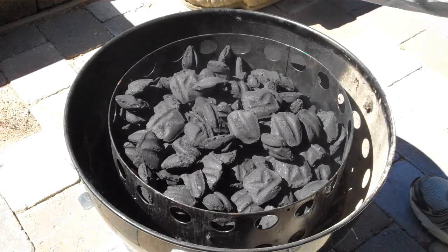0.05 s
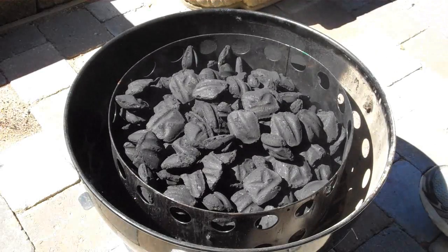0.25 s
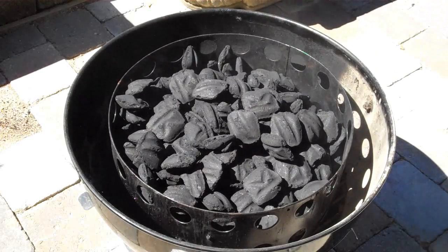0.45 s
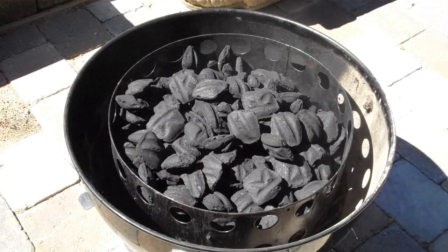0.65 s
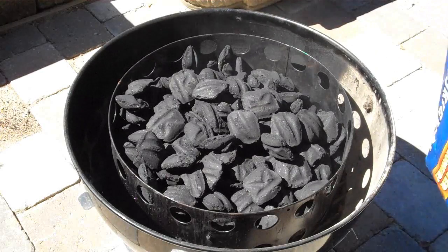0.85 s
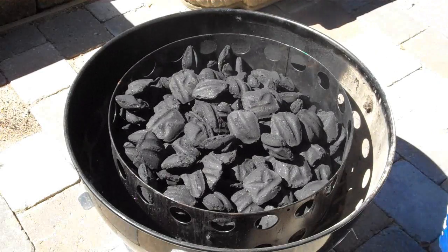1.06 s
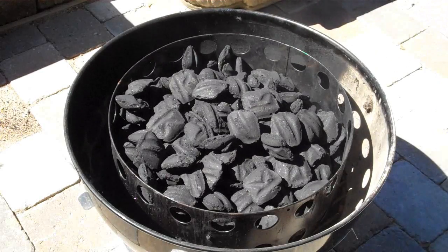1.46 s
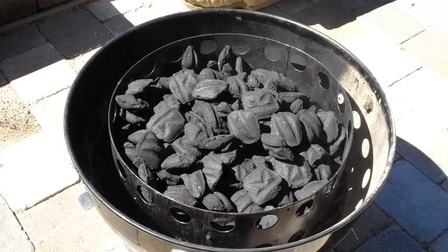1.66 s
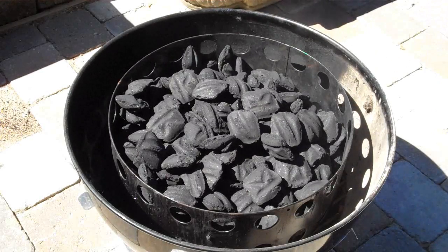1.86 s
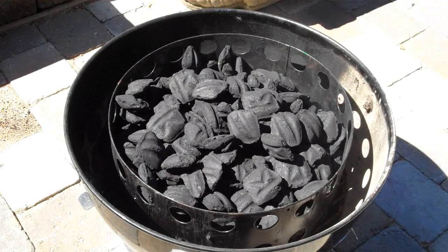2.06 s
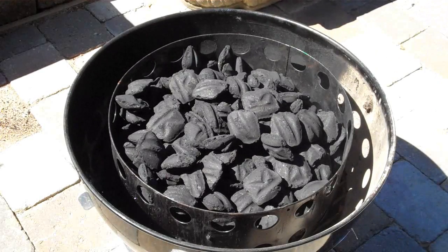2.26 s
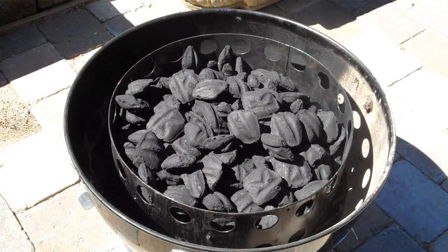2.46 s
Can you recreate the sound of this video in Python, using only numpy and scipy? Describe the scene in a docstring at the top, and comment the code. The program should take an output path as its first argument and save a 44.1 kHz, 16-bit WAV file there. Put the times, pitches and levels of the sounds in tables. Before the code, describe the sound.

Stiff paper crumples as a charcoal bag is handled near the microphone on a patio. A few tiny high chirps come first, then lumps shift with hollow knocks, and the paper snaps and ticks again as it settles.

```python
"""A stiff paper bag of charcoal is lifted, tipped and set down beside a kettle grill on a patio.
The paper crumples in tiny damped rings, its panels snap and its stiff folds tick,
while the briquettes inside tumble and knock dully against it.
A few short high chirps sound early on, over faint outdoor air; nearby walls answer."""
import sys
import numpy as np
from scipy import signal
from scipy.fft import rfft, irfft, next_fast_len
from scipy.io import wavfile
from scipy.ndimage import uniform_filter1d, map_coordinates

SR = 44100
rng = np.random.default_rng(int(sys.argv[2]) if len(sys.argv) > 2 else 0)


def generate_wav(signal):
    """Clip the signal to [-1, 1] and save it as 16-bit WAV at the path in sys.argv[1]."""
    frames = np.transpose(np.atleast_2d(signal))
    scaled = np.clip(frames, -1, 1) * 32767
    pcm = np.round(scaled).astype(np.int16)
    wavfile.write(sys.argv[1], SR, pcm)


N = 110250


def amp(db):
    """Decibels to gain."""
    return 10 ** (np.asarray(db) / 20)


def unit(x):
    """Scale to rms 1."""
    return x / np.sqrt(np.mean(x ** 2) + 1e-20)


def along(points, hz):
    """Interpolate (Hz, value) points on a log frequency axis."""
    point_hz, values = np.transpose(points)
    return np.interp(np.log(hz + 1), np.log(point_hz + 1), values)


def curves(rows):
    """One value per sample for each column after the time."""
    times_s, *columns = np.transpose(rows)
    return [np.interp(np.arange(N) / SR, times_s, column) for column in columns]


def coloured(x, spectrum):
    """Minimum-phase filter through (Hz, dB) points."""
    size = 2 * next_fast_len(N // 2 + 8192)
    gain = amp(along(spectrum, np.fft.rfftfreq(size, 1 / SR)))
    cepstrum = irfft(np.log(gain), size)
    cepstrum[1:size // 2] *= 2
    cepstrum[size // 2 + 1:] = 0
    return irfft(rfft(x, size) * np.exp(rfft(cepstrum)), size)[..., :N]


def add(track, start_s, sound):
    """Mix a sound in at a time."""
    part = track[max(round(start_s * SR), 0):][:len(sound)]
    part += sound[:len(part)]


def burst(t, t60_s, lo_hz, hi_hz, spiky):
    """A dying spray of micro-cracks in a band, starting at about rms 1."""
    fade = amp(-60 * t / t60_s)
    cracks = rng.standard_normal(len(t)) * np.exp(spiky * rng.standard_normal(len(t)))
    bandpass = signal.butter(2, [lo_hz, hi_hz], "band", fs=SR, output="sos")
    return unit(signal.sosfilt(bandpass, cracks * fade)) * np.sqrt(np.mean(fade ** 2))


def grains(per_s, lo_hz, hi_hz, decay_cycles, spread_db, samples):
    """Random tiny damped rings, with an even spectrum between two pitches."""
    when, pitch, strength, polarity = rng.random((int(per_s * N / SR), 4)).T
    hz = lo_hz * (hi_hz / lo_hz) ** pitch[:, None]
    age = np.arange(samples)
    cycles = hz * age / SR
    gain = amp(-spread_db * np.log(1 - .97 * strength)) * np.sign(polarity - .5)
    rings = gain[:, None] * hz * np.sin(2 * np.pi * cycles) * np.exp(-cycles / decay_cycles)
    positions = (when * N).astype(int)[:, None] + age
    return np.bincount(positions.ravel(), rings.ravel(), N)[:N]


def stick_slip(per_s, t60_s, depth):
    """A gain that jumps at random slips and settles back."""
    chance, size = rng.random((2, N))
    slips = (chance < per_s / SR) * size
    jolts = signal.lfilter([1], [1, -amp(-60 / (t60_s * SR))], slips)
    return unit(1 + depth * jolts)


# Each row: time in seconds, relative levels in dB of tumbling lumps, crumpling paper, fine crackle.
RUSTLE_LEVELS = [(0,-32,-36,-39),(.1,-43.5,-44,-53.5),(.235,-31,-36.5,-40.5),(.285,-42,-40.5,-47),(.41,-37.5,-32,-40.5),(.485,-23.5,-30,-33),(.53,-30,-29,-36),(.59,-27.5,-24.5,-29.5),(.655,-23.5,-18.5,-22),(.725,-22.5,-18.5,-26),(.765,-24,-25,-34),(.86,-20.5,-22,-29.5),(.97,-24,-23.5,-34),(1.03,-30.5,-30.5,-37),(1.12,-33.5,-36.5,-44.5),(1.29,-34,-34,-45),(1.43,-40,-41.5,-48.5),(1.6,-44.5,-41.5,-52),(1.67,-39,-40.5,-43),(1.85,-40,-39,-53),(1.9,-32.5,-28.5,-43.5),(2.06,-30.5,-25,-32),(2.155,-39.5,-35,-45),(2.28,-34.5,-30,-36),(2.32,-43,-44.5,-61),(2.41,-46.5,-46,-55),(2.46,-34,-26,-36.5),(2.5,-52,-47,-62)]
# Spectra of the three layers. Each row: frequency in Hz, gain in dB.
LUMP_SPECTRUM = [(30,-28.5),(90,-7.5),(150,-12.5),(230,-2.5),(335,0.5),(680,-1.5),(1600,-28.5),(4000,-58)]
PAPER_SPECTRUM = [(200,-22.5),(500,-8),(850,-0.5),(1300,-0.5),(1800,-0.5),(2600,-2.5),(3400,-5.5),(5000,-11),(15000,-70)]
CRACKLE_SPECTRUM = [(1500,-37),(3200,-0.5),(4500,1),(8500,-6.5),(10500,-10),(12000,-16),(14000,-31)]


def rustle():
    """Lumps tumble, paper crumples and fine creases crackle as the bag moves."""
    lumps_db, paper_db, crackle_db = curves(RUSTLE_LEVELS)
    lumps = grains(per_s=900, lo_hz=60.2, hi_hz=1410, decay_cycles=2.57, spread_db=2.5, samples=1500)
    paper = grains(per_s=5000, lo_hz=525, hi_hz=6240, decay_cycles=0.63, spread_db=4.5, samples=250)
    crackle = grains(per_s=2800, lo_hz=2920, hi_hz=13400, decay_cycles=0.31, spread_db=4.5, samples=60)
    layers = amp(lumps_db) * unit(coloured(lumps, LUMP_SPECTRUM))
    layers += amp(paper_db + 1) * unit(coloured(paper, PAPER_SPECTRUM))
    layers += amp(crackle_db + 1) * unit(coloured(crackle, CRACKLE_SPECTRUM))
    return layers * stick_slip(per_s=42, t60_s=0.013, depth=0.67)


# Spectrum of the air. Each row: frequency in Hz, gain in dB.
AIR_SPECTRUM = [(25, -7), (60, -1.5), (1000, -5), (3000, -8.5), (8000, -22), (11500, -41), (14000, -57)]


def outdoor_air():
    """Steady faint noise, wider in the treble and a little louder on the left."""
    mid, side = rng.standard_normal((2, N))
    side = coloured(side, [(200, -19.5), (1000, -10.5), (4000, -2.5)])
    air = unit(coloured(np.array([mid + side, mid - side]), AIR_SPECTRUM))
    return amp(-43) * air * amp([[1.1], [-1.1]])


# Snapping panels. Each row: start in seconds, relative level in dB, panel pitch in Hz,
# relative bass and treble levels in dB, crinkle t60 in seconds.
PANEL_SNAPS = [(.033,-27.5,740,-28.5,-43,0.14),(.096,-29.5,1740,-29.5,-36.5,0.077),(.183,-30.5,1030,-52,-42,0.068),(0.2107,-20.5,1190,-22,-32,0.067),(.262,-25.5,710,-38,-35.5,0.018),(.318,-22,2110,-33,-37.5,0.02),(0.3471,-23.5,2670,-37,-34,0.035),(0.4489,-18.5,686,-34,-30,0.099),(0.485,-21.5,1530,-26,-26,0.12),(.733,-15,2080,-36,-23.5,0.036),(.919,-21,960,-39,-31,0.029),(0.9647,-23,1480,-21,-30,0.071),(1.141,-19,880,-29,-27.5,0.087),(1.196,-19,895,-32,-32.5,0.044),(1.2342,-18.5,760,-42,-32.5,.049),(1.287,-22.5,2130,-47,-41,0.037),(1.351,-28.5,1310,-32,-34.5,0.15),(1.7594,-24,720,-26.5,-34.5,0.11),(1.8221,-23,760,-33,-43.5,0.11),(1.874,-14,1380,-28,-25,0.048),(1.9674,-20,910,-25,-32.5,0.079),(2.0399,-15.5,1120,-26,-50,0.07),(2.063,-21,820,-24.5,-26.5,0.049),(2.122,-21.5,980,-28.5,-28.5,.05),(2.182,-28.5,725,-35.5,-32,0.035),(2.223,-30.5,814,-46,-31,0.067),(2.353,-33,1000,-38,-43,0.099)]
# Filter on all snaps. Each row: frequency in Hz, gain in dB.
SNAP_EQ = [(50,-1),(150,-2.5),(1500,0.5),(6000,-1),(8500,-9),(10500,-10),(12000,-19.5),(14500,-49)]


def panel_snaps():
    """A paper panel flips with a pop and a crack, flexes near its pitch, shakes the bag and crinkles."""
    t60_cycles, bass_t60_s = 6.4, 0.064
    out, t = np.zeros(N), np.arange(SR // 6) / SR
    for start_s, db, hz, bass_db, treble_db, crinkle_t60_s in PANEL_SNAPS:
        pop = amp(10) * np.sin(2 * np.pi * hz * t) * amp(-60 * t * hz / t60_cycles)
        flex = amp(-3.5) * burst(t, 1.29 * crinkle_t60_s, lo_hz=0.85 * hz, hi_hz=1.16 * hz, spiky=0.77)
        crinkle = amp(7) * burst(t, crinkle_t60_s, lo_hz=1060, hi_hz=3590, spiky=0.54)
        shake = burst(t, bass_t60_s, lo_hz=219, hi_hz=580, spiky=0.05)
        push = amp(-12) * burst(t, bass_t60_s, lo_hz=71, hi_hz=178, spiky=0.23)
        fizz = burst(t, t60_s=0.042, lo_hz=3650, hi_hz=11300, spiky=1.53)
        crack = amp(12.5) * burst(t, t60_s=0.0018, lo_hz=2510, hi_hz=13400, spiky=0.19)
        middle = amp(db) * (pop + flex) + amp((db + treble_db) / 2) * crinkle
        bass = amp(bass_db + 3) * (shake + push)
        treble = amp(treble_db + 6) * (fizz + crack)
        add(out, start_s, middle + bass + treble)
    return coloured(out, SNAP_EQ)


# Briquettes hitting the bag. Each row: start in seconds, relative level in dB, pitch in Hz.
BRIQUETTE_KNOCKS = [(.162,-23,690),(.734,-6.5,360),(0.78,-6.5,328),(0.864,-11,349),(.885,-7.5,410),(.919,-6,514),(1.3075,-10.5,810),(1.5301,-22,864),(1.581,-26,1100),(1.717,-12.5,890),(2.424,-24.5,880)]


def briquette_knocks():
    """A falling briquette gives a hollow ring, a gritty scuff and a soft push."""
    t60_cycles = 18
    out, t = np.zeros(N), np.arange(SR // 5) / SR
    for start_s, db, hz in BRIQUETTE_KNOCKS:
        ring = np.sin(2 * np.pi * hz * t) * amp(-60 * t * hz / t60_cycles)
        scuff = amp(-6) * burst(t, t60_s=0.076, lo_hz=0.73 * hz, hi_hz=2.1 * hz, spiky=0.62)
        push = amp(-31) * burst(t, t60_s=0.26, lo_hz=55, hi_hz=159, spiky=0.11)
        add(out, start_s, amp(db - 6) * (ring + scuff + push))
    return out


# High chirps. Each row: centre in seconds, level in dB.
CHIRP_SWELLS = [(0.2154, -12), (0.225, -19), (0.289, -22), (0.2962, -18), (0.475, -14)]


def chirps():
    """Brief Gaussian swells of one slightly wavering high tone."""
    pitch_hz, waver_rms_hz, sigma_s = 3770, 232, 0.0017
    t = np.arange(N) / SR
    hz = pitch_hz + waver_rms_hz * unit(uniform_filter1d(rng.standard_normal(N), size=50))
    swells = sum(amp(db) * np.exp(-.5 * ((t - centre_s) / sigma_s) ** 2) for centre_s, db in CHIRP_SWELLS)
    return swells * np.sin(2 * np.pi * np.cumsum(hz) / SR)


# Folds giving way. Each row: start in seconds, relative level in dB, ring pitch in Hz.
FOLD_TICKS = [(0.3468,-21,3240),(0.4832,-18,3800),(.6025,-20,4360),(0.7263,-13,5830),(0.883,-12.5,4950),(.9185,-13,3200),(.9645,-9.5,6500),(0.976,-9,7040),(1.401,-17,1400),(1.4561,-22,6600),(1.6983,-21.5,7800),(1.838,-14.5,7700),(1.8747,-7.5,5800),(1.945,-10.5,4460),(1.979,-18,5550),(2.0228,-26,6000),(2.0407,-17,4200),(2.1229,-6.5,5060),(2.1822,-12,8100),(2.2276,-13,3570)]


def fold_ticks():
    """A stiff fold gives: a brief ring with one overtone, and a separate crack in each channel."""
    t60_cycles, overtone_ratio = 14.4, 1.727
    out, t = np.zeros((2, N)), np.arange(SR // 30) / SR
    for start_s, db, hz in FOLD_TICKS:
        phase = 2 * np.pi * hz * t
        ring = (np.sin(phase) + amp(-5) * np.sin(overtone_ratio * phase)) * amp(-60 * t * hz / t60_cycles)
        for channel in out:
            crack = amp(-3) * burst(t, t60_s=0.00087, lo_hz=1500, hi_hz=12700, spiky=0.2)
            add(channel, start_s, amp(db) * (ring + crack))
    return coloured(out, [(10500, -1), (14000, -27)])


# Where the bag is. Each row: time in seconds, lag of left behind right in ms, left over right in dB.
BAG_POSITION = [(.9, 0.035, 2), (1.8, .11, 1.6)]


def panned(x):
    """Sound from the bag reaches left and right with a small lag and level offset."""
    lag_ms, left_db = curves(BAG_POSITION)
    half_lag_samples = lag_ms * SR / 1000 / 2
    left = amp(left_db / 2) * map_coordinates(x, [np.arange(N) - half_lag_samples])
    right = amp(-left_db / 2) * map_coordinates(x, [np.arange(N) + half_lag_samples])
    return np.array([left, right])


# Decay of the late echo. Each row: frequency in Hz, t60 in seconds.
ECHO_T60 = [(100,0.072),(3000,0.09),(12000,0.26)]
# Filter on the echo. Each row: frequency in Hz, gain in dB.
ECHO_EQ = [(100,-10.5),(500,-14),(1500,-9.5),(4000,-1.5),(12000,1.5)]


def patio_echo(x):
    """Paving, grill and walls scatter a short diffuse echo, crossfading from one random tail to the next."""
    step_s, early_t60_s = 0.04, 0.022
    t = np.arange(N) / SR
    echo = np.zeros((2, N))
    for centre_s in np.arange(0, t[-1] + step_s, step_s):
        hz, age_s, noise = signal.stft(rng.standard_normal((2, SR // 5)), SR, nperseg=256)
        early = amp(10) * amp(-60 * age_s / early_t60_s)
        late = amp(-60 * age_s / along(ECHO_T60, hz)[:, None])
        tail = signal.istft(noise * (early + late), SR, nperseg=256)[1]
        part = x * np.sqrt(np.clip(1 - abs(t - centre_s) / step_s, 0, 1))
        echo += signal.oaconvolve(part[None], tail / np.linalg.norm(tail[0]), axes=1)[:, :N]
    return coloured(echo, ECHO_EQ) * amp([[.8], [-.8]])


def scene():
    """The bag and the chirps over outdoor air; the ticks send less to the echo."""
    near = rustle() + panel_snaps() + briquette_knocks() + chirps()
    ticks = fold_ticks()
    echo = patio_echo(near + amp(-5) * ticks.mean(axis=0))
    return panned(near) + ticks + echo + outdoor_air()


def record(dry):
    """Hard limit at full scale, then a brick-wall low-pass."""
    cutoff_hz = 14560
    size = next_fast_len(N + 8192)
    passband = np.fft.rfftfreq(size, 1 / SR) < cutoff_hz
    return irfft(rfft(np.clip(dry, -1, 1), size) * passband, size)[:, :N]


dry = scene()
out = record(dry)
generate_wav(out)
```